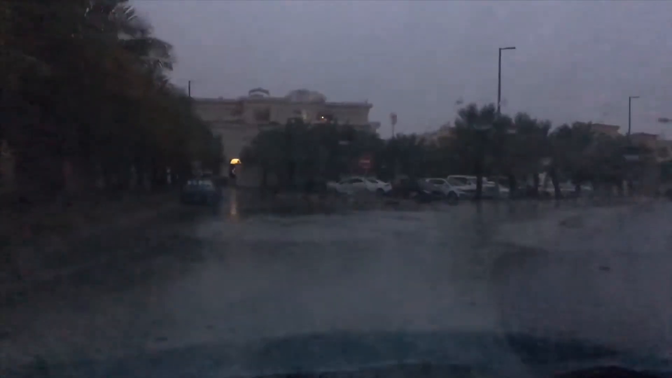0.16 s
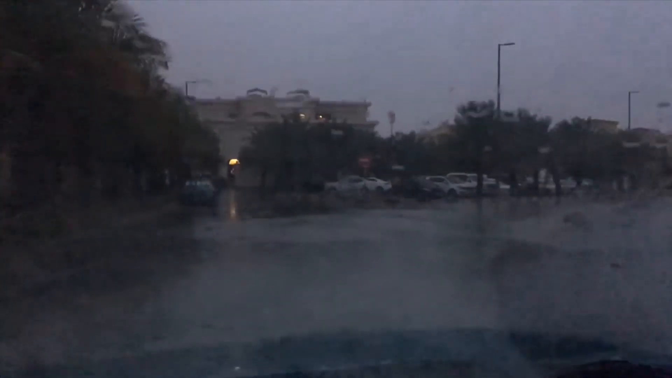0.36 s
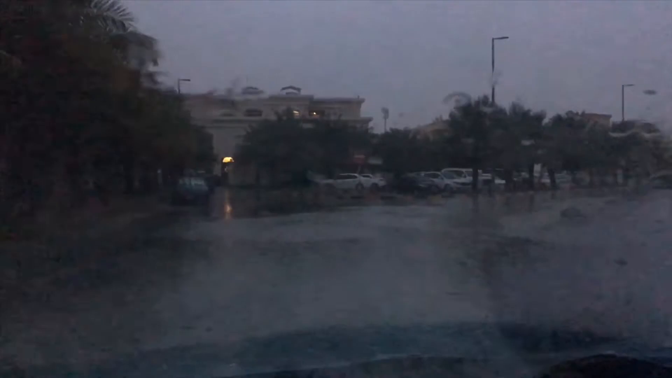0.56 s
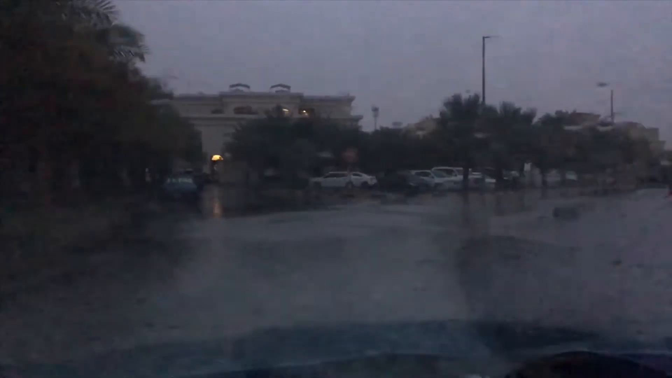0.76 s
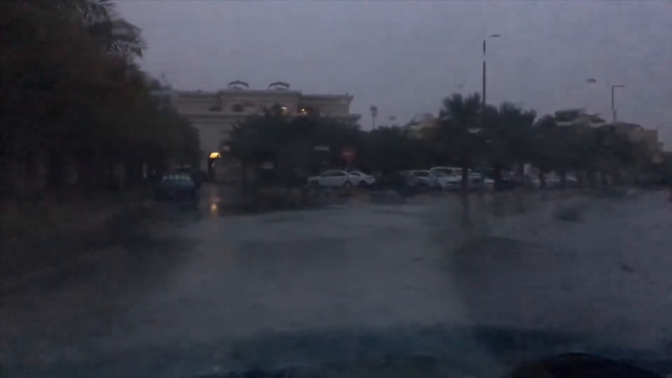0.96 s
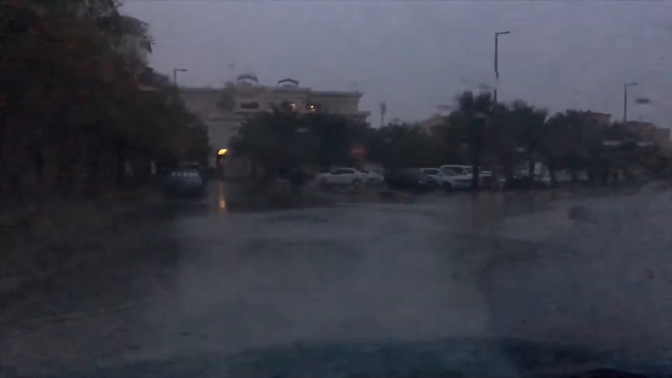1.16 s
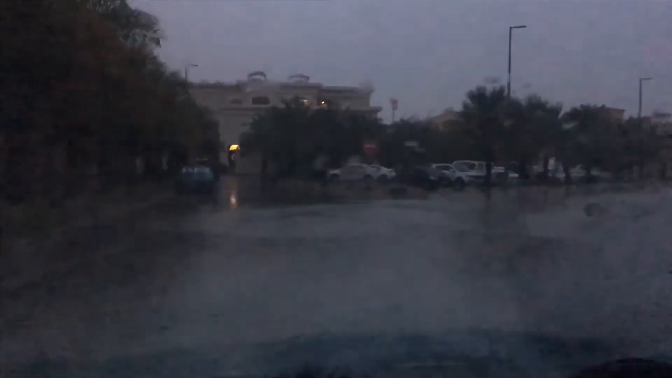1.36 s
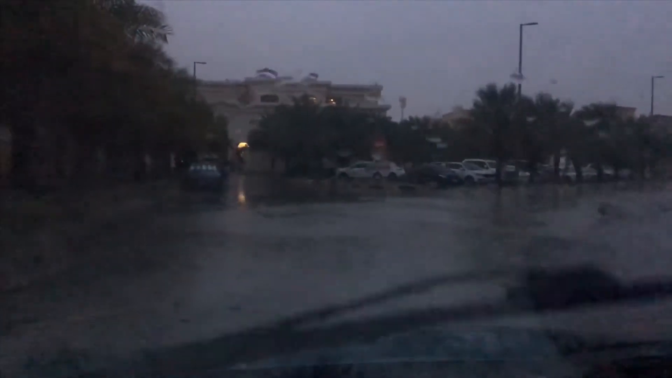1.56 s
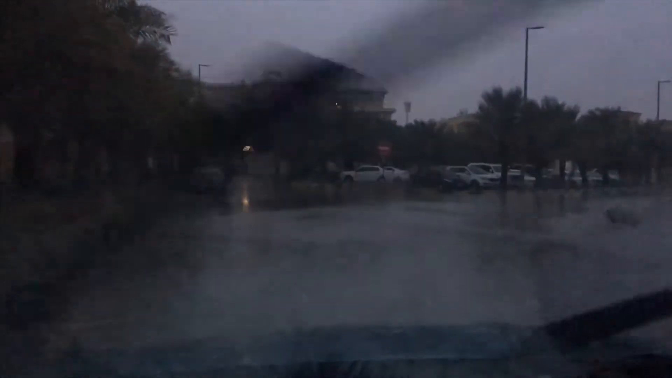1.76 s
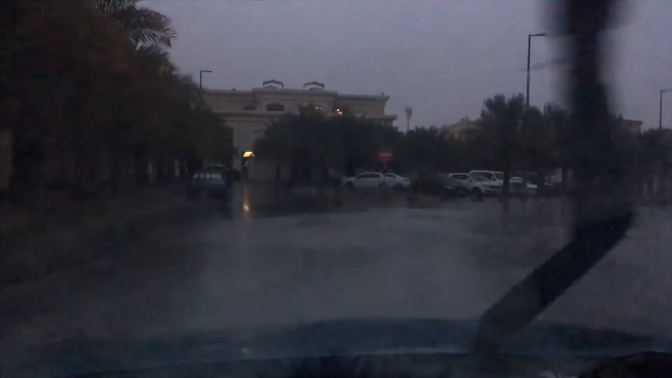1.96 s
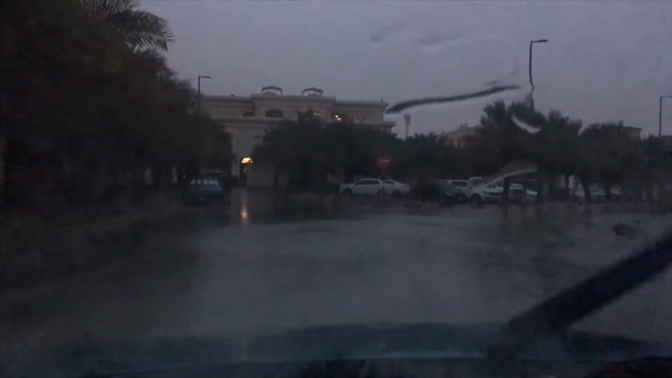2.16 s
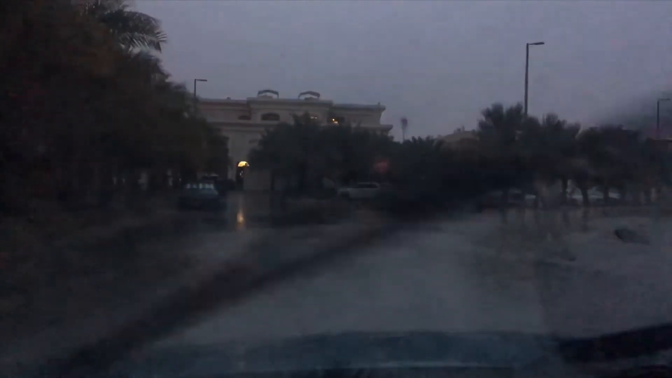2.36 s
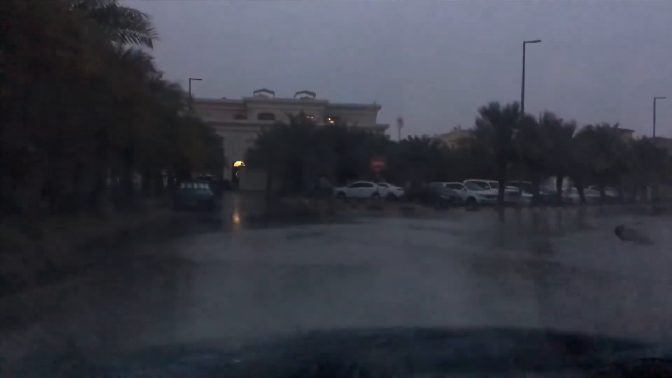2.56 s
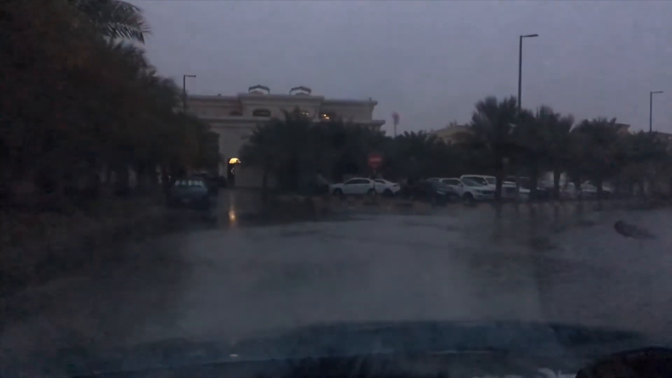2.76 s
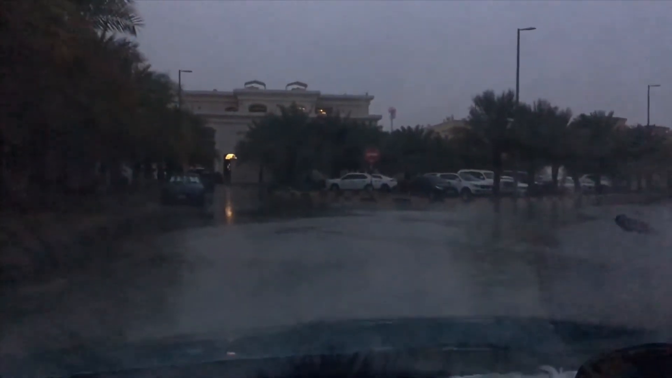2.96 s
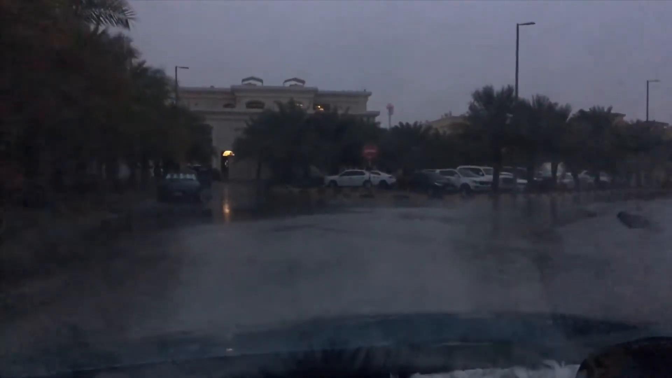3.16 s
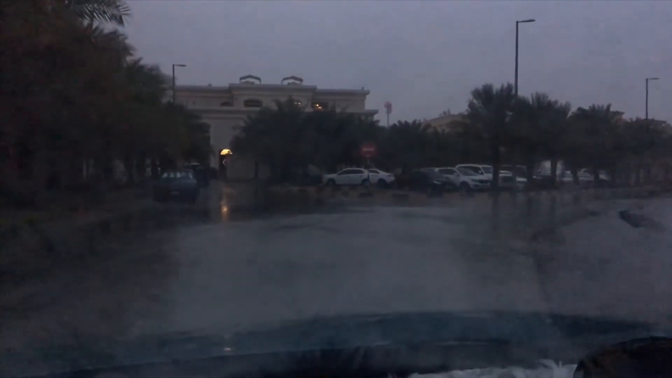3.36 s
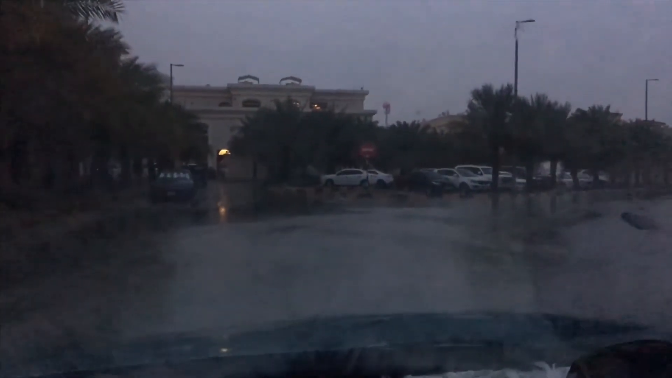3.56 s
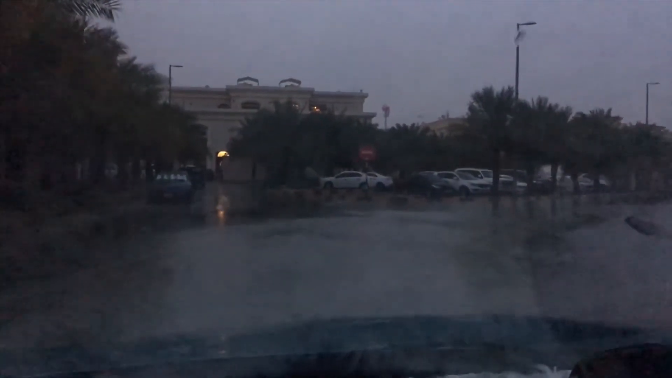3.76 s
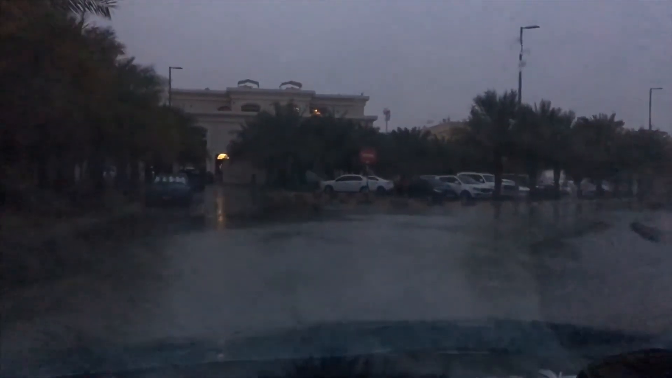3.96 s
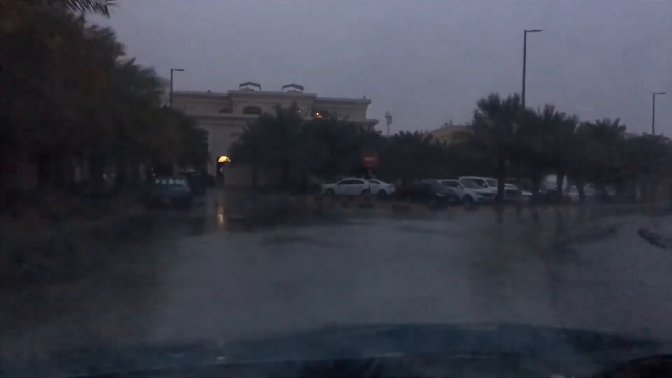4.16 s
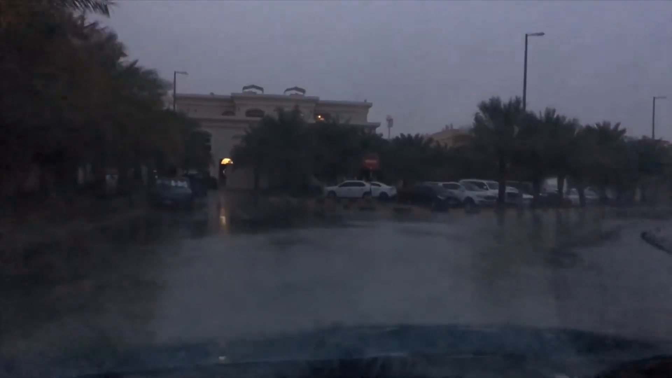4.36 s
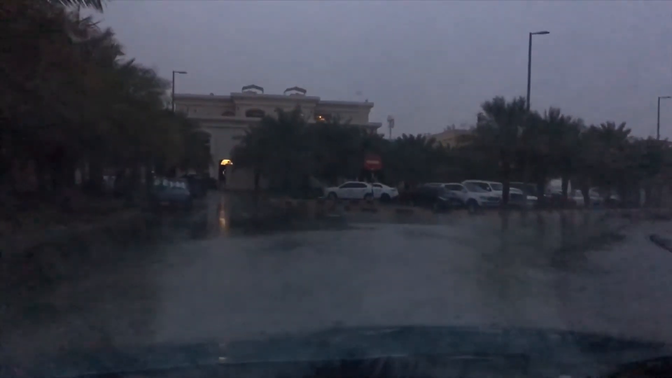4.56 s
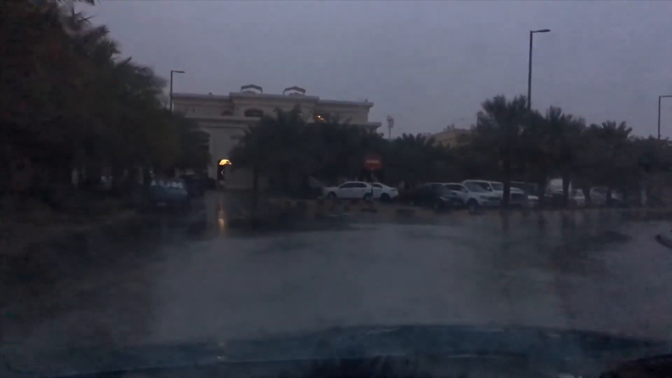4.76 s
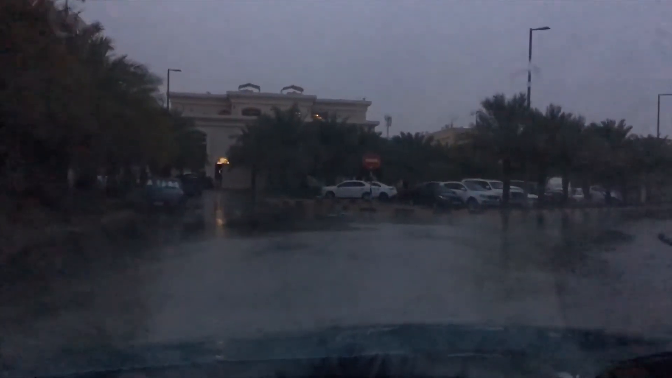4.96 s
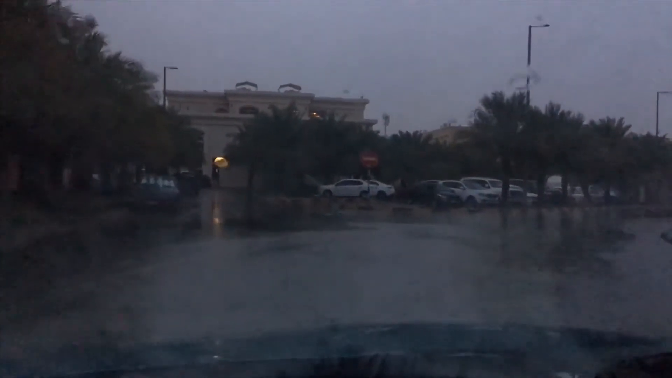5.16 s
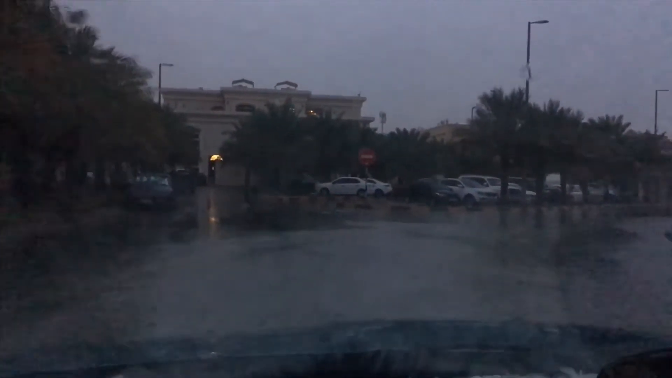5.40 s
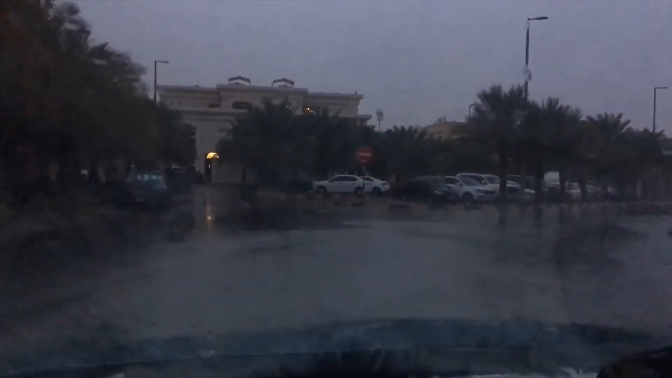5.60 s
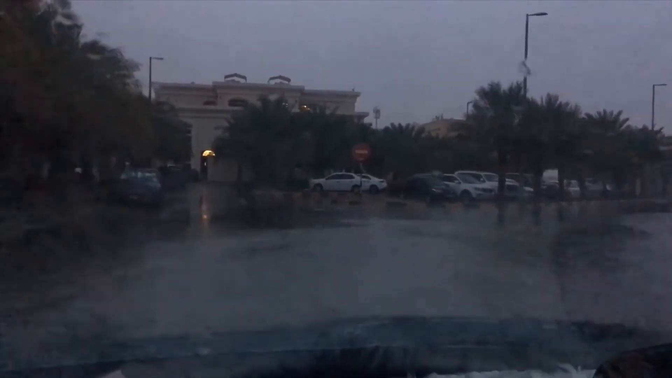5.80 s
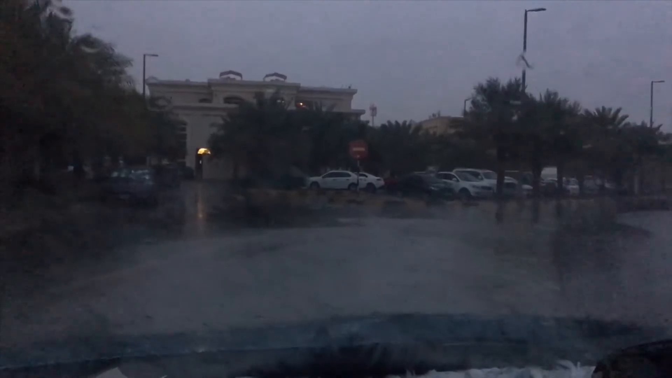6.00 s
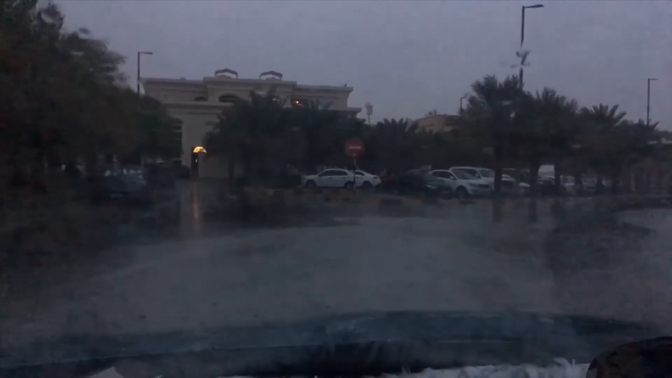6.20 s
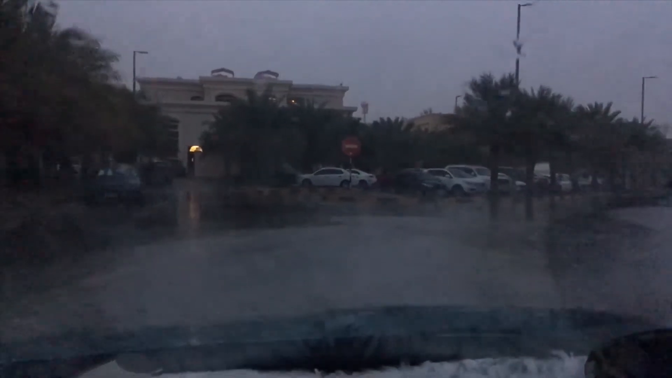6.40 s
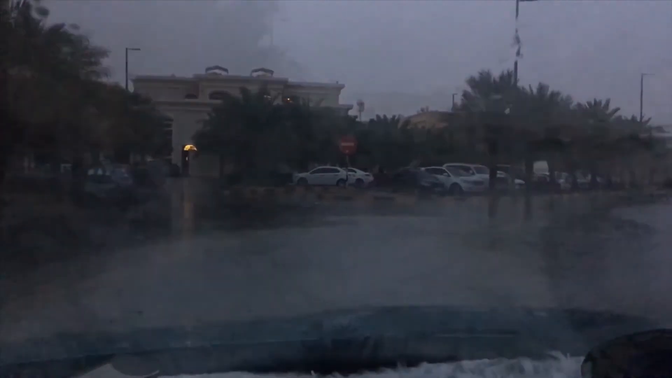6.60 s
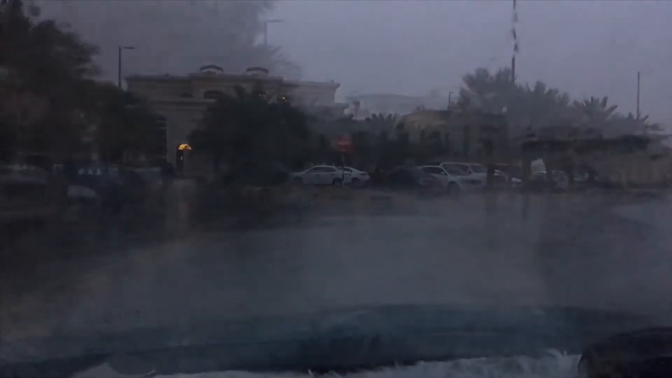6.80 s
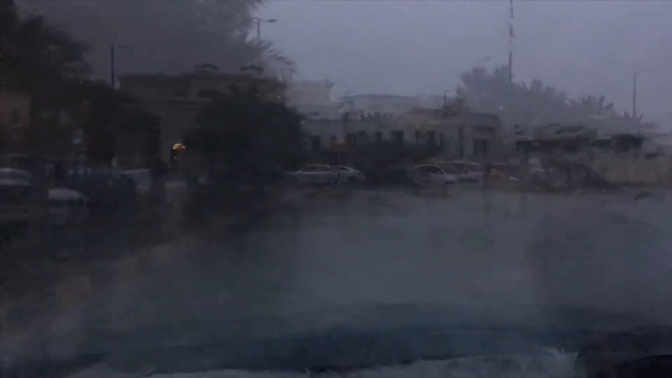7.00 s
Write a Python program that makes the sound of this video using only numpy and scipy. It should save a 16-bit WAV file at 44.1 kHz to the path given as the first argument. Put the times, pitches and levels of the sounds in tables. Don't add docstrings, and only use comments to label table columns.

```python
import sys
import numpy as np
from scipy import signal
from scipy.io import wavfile
from scipy.ndimage import uniform_filter1d

SR = 44100
rng = np.random.default_rng(int(sys.argv[2]) if len(sys.argv) > 2 else 0)


def pcm_store(signal):
    levels = np.round(np.clip(np.atleast_2d(signal), -1, 1) * 32767)
    wavfile.write(sys.argv[1], SR, levels.astype(np.int16).T)


def ratio_of_db(decibels):
    return 10 ** (np.asarray(decibels, float) / 20)


N = 310464
T = np.arange(N) / SR


def level(x, db):
    return x * ratio_of_db(db) / np.sqrt(np.mean(x ** 2) + 1e-18)


def to_peak(x, db):
    return x * ratio_of_db(db) / np.abs(x).max()


def decay(t, t60):
    return ratio_of_db(-60 * t / t60)


def ring(x, hz, width):
    return signal.lfilter(*signal.iirpeak(min(hz, .45 * SR), hz / width, SR), x)


def body(x, modes):
    return sum((-1) ** k * ratio_of_db(db) * ring(x, hz, width) for k, (hz, width, db) in enumerate(modes))


def fade(x, t60):
    return signal.lfilter([1], [1, -np.exp(-np.log(1000) / (t60 * SR))], x)


def walk(rate):
    k = int(SR / rate)
    steps = np.repeat(rng.standard_normal(N // k + 1), k)
    return 1.57 * uniform_filter1d(uniform_filter1d(steps, k), k)[:N]


def curve(table):
    s, *columns = np.transpose(table)
    return [np.interp(T, s, c) for c in columns]


def boom():
    # time in seconds, level in dB.
    air_levels = [(0, -29), (.7, -28), (1.15, -34.5), (1.5, -30), (2, -34), (2.85, -30), (3.1, -35.5),
                  (3.9, -30), (4.3, -24.5), (4.7, -32), (5.3, -28), (5.7, -27), (6.1, -26), (6.5, -25.5),
                  (7.04, -30)]
    # time in seconds, level in dB.
    panel_levels = [(0, -35), (.5, -35.5), (1.2, -37), (2.1, -31.5), (2.7, -36.5), (3.3, -36.5), (3.9, -37),
                    (4.3, -35), (5.3, -34), (6, -33), (6.5, -36), (7.04, -36)]
    # pitch in Hz, width in Hz, level in dB.
    air_modes = [(33.8, 9.5, -9.5), (52.1, 16.2, -5), (69.4, 16.4, -10.5)]
    # pitch in Hz, width in Hz, level in dB.
    panel_modes = [(85.5, 38.8, 5), (125.5, 36.7, 0), (153.6, 25, 1), (280, 64, -15.5), (368.4, 77, -18)]
    air = body(body(rng.standard_normal(N), air_modes), [(53.3, 28.0, 0)])
    air = air / uniform_filter1d(air ** 2, size=5000) ** 0.4
    air = air[::-1]
    panels = 0
    for hz, width, db in panel_modes:
        hum = ring(ring(rng.standard_normal(N), hz, width), hz, 1.6 * width)
        panels = panels + ratio_of_db(db + 2.0 * walk(9.8)) * hum
    air = level(air, -0.097) * ratio_of_db(curve(air_levels)[0] + 1.53 * walk(8.0))
    return air + level(panels, 0.13) * ratio_of_db(curve(panel_levels)[0])


def engine():
    # time in seconds, firing rate in Hz, level in dB.
    speed = [
        (0, 27.41, -66),
        (3, 28.94, -35.5),
        (3.8, 31.7, -34.5),
        (4.4, 32.68, -31),
        (5.4, 33.56, -31.5),
        (6.3, 35.56, -30.5),
        (7.04, 36.77, -36),
    ]
    # multiple of the firing rate, level in dB.
    orders = [(1, 2.5), (3, -19.5), (4, -16.5), (5, -18.5), (6, -19), (7, -39)]
    hz, db = curve(speed)
    turn = 2 * np.pi * np.cumsum(hz * (1 + 0.0049 * walk(6.5))) / SR
    hum = sum(ratio_of_db(order_db + 1.17 * walk(4.3)) * np.sin(k * turn + k * k) for k, order_db in orders)
    return ratio_of_db(db) * hum


def rain(per_second=260, scatter_db=3.5, colour_db=3.0, bed=0.28, crisp=1.5):
    # time in seconds, patter level in dB, brightness in dB per octave above 3500 Hz.
    shower = [(0, -56, -0.5), (.4, -54.5, 2), (.75, -57, 4), (1.1, -55, 0.5), (1.6, -51.5, -1),
              (1.78, -59.5, 1.5), (2.0, -57.5, 4.5), (2.6, -56, 2), (2.85, -59, 0.5), (3.2, -55, -0.5),
              (3.55, -58, 0.5), (4.3, -57.5, 0), (5.4, -56.5, -1.5), (6.3, -58, 0.5), (7.04, -58.5, 0)]
    # frequency in Hz, level in dB per Hz.
    patter = [(240, -32), (400, 1), (742, -7), (994, -8.5), (1380, -13), (1990, -13), (2800, -18.5),
              (3580, -14.5), (5030, -32), (5960, -24), (10100, -37.5), (11000, -35), (16000, -40)]
    biggest_db, treble_bed = 5, .5
    patter_db, bright = curve(shower)
    chance = rng.random((2400, 3))
    keep = chance[:, 2] < per_second * T[-1] / len(chance)
    where = (chance[:, 0] * N).astype(int)
    size = keep * ratio_of_db(np.minimum(-scatter_db * np.log(1 - chance[:, 1]), biggest_db))
    tint, out = rng.standard_normal(len(chance)), 0
    shape_hz, shape_db = np.transpose(patter)
    for hz in 450 * 2 ** np.arange(0, 5.3, 1 / 3):
        tint = 0.91 * tint + 0.77 * rng.standard_normal(len(chance))
        kicks = np.bincount(where, (size * ratio_of_db(colour_db * tint)) ** 2, N)
        power = fade(kicks, 0.0072 * (hz / 3000) ** -.45)
        blur = np.clip(bed * (hz / 3000) ** -.4, treble_bed, 1)
        click = crisp * np.sqrt((1 - blur) * kicks / power.mean())
        power = blur * ratio_of_db(2.0 * walk(22)) + (1 - blur) * power / power.mean()
        hiss = rng.standard_normal(N) * np.sqrt(power) + click
        hiss = ring(ring(hiss, hz, hz / 3), hz, hz / 3)
        db = np.interp(np.log(hz), np.log(shape_hz), shape_db) + 10 * np.log10(hz)
        out = out + level(hiss, db) * ratio_of_db(bright * max(np.log2(hz / 3500), 0))
    return level(out, 0.43) * ratio_of_db(patter_db)


def spits():
    # start in
    # seconds, peak of the click in dB, ring near 3.5 kHz in dB relative to it.
    clicks = [(0.0473, -48, -11), (0.0897, -59, 7), (0.0897, -46, -3), (0.171, -39, -2), (0.187, -23, -23),
              (0.281, -36, -17), (0.3272, -41, -8), (0.3561, -42, -5), (0.385, -38, -4), (0.414, -39, 0),
              (0.4573, -33, -4), (0.4853, -41, -20), (0.5062, -31, -22), (0.5726, -40, -15),
              (0.6799, -48, -4), (0.6802, -26, -20), (0.6953, -19, -27), (0.7422, -38, -16),
              (0.9363, -49, -8), (0.9632, -41, 0), (0.9727, -40, -10), (1.034, -55, 3), (1.1034, -46, -8),
              (1.131, -44, -7), (1.1816, -36, -21), (1.2221, -26, -13), (1.2565, -39, -7), (1.3414, -40, -3),
              (1.4476, -51, 1), (1.4596, -44, 0), (1.6048, -51, -3), (1.6886, -46, -4), (1.8731, -47, -5),
              (1.9405, -55, -6), (1.9406, -38, -18), (1.9629, -41, -22), (1.986, -49, 9), (2.0118, -24, -4),
              (2.0905, -40, -12), (2.133, -46, -8), (2.1465, -41, -7), (2.2034, -47, -12),
              (2.2177, -38, -15), (2.2434, -34, -14), (2.3092, -42, -15), (2.362, -49, -6), (2.391, -48, -3),
              (2.4109, -53, -2), (2.4513, -45, -19), (2.5755, -37, -22), (2.6788, -45, -12),
              (2.7375, -45, 7), (2.7891, -49, -10), (2.9442, -47, 3), (3.024, -48, -8), (3.0959, -44, -6),
              (3.185, -42, -7), (3.2091, -46, -4), (3.2839, -50, 4), (3.3124, -47, 2),
              (3.3923, -57, -3), (3.4228, -55, -4), (3.4467, -49, -12), (3.4951, -49, 5), (3.524, -47, -13),
            (3.563, -48, -9), (3.5869, -55, -1), (3.6138, -58, -5), (3.7835, -54, -8), (3.8573, -56, -10),
            (3.8573, -50, -16), (3.9226, -60, 1), (3.967, -58, -1), (3.979, -41, -14), (4.0399, -53, 5),
            (4.1102, -46, -4), (4.1431, -51, -4), (4.316, -46, -12), (4.3326, -54, -3), (4.5323, -45, -14),
            (4.5607, -49, -15), (4.659, -43, 2), (4.6934, -45, -7), (4.8306, -55, 1), (4.859, -45, -12),
            (4.8865, -53, -10), (4.926, -44, -12), (5.0092, -57, -3), (5.095, -49, -1), (5.1294, -54, 6),
            (5.1683, -52, 0), (5.2636, -52, -14), (5.2776, -51, -12), (5.313, -55, -5), (5.3544, -56, -2),
            (5.4831, -44, -13), (5.5175, -45, -8), (5.5879, -59, 7), (5.5879, -52, -5), (5.8044, -63, 5),
            (5.8044, -52, -6), (5.8857, -50, -6), (5.9366, -52, -1), (6.0164, -55, 0), (6.0438, -57, 5),
            (6.0613, -51, -13), (6.0957, -54, -3), (6.1566, -69, 8), (6.1566, -50, 1), (6.201, -43, -13),
            (6.3197, -49, -12), (6.3631, -47, -7), (6.392, -48, -10), (6.4758, -53, -12), (6.5162, -54, -6),
            (6.5387, -53, 2), (6.6799, -54, -4), (6.7712, -55, -1), (6.8515, -54, -4), (6.9094, -55, 0)]
    spit_t60_s, pane_t60_s, pane_hz, loudest_db = 0.006, .02, 3500, -33
    out, t = np.zeros(N + 1000), np.arange(1000) / SR
    top = signal.butter(2, [3800, 12500], "band", fs=SR)
    for s, db, pane_db in clicks:
        noise = rng.standard_normal((2, len(t)))
        noise[:, 0] = 2.9
        spit = signal.lfilter(*top, noise[0] * decay(t, spit_t60_s))
        pane = ring(noise[1] * decay(t, pane_t60_s), pane_hz * ratio_of_db(1.2 * noise[1, -1]), 1800)
        hit = to_peak(spit, 0) + to_peak(pane, pane_db - 0.5)
        out[int(s * SR):][:len(t)] += hit * ratio_of_db(min(db, loudest_db) - 4.5)
    return out[:N]


def bursts(hits):
    out, t = np.zeros(N + 3000), np.arange(3000) / SR
    for s, db, hz, spread in hits:
        slap = rng.standard_normal(len(t)) * (decay(t, 0.0032) + 0.39 * decay(t, 0.072))
        slap[0] = 3.9
        wide = ring(slap, hz, hz * spread * 0.86)
        burst = ring(wide, hz, hz * spread * 0.39) + 0.2 * wide
        out[int(s * SR):][:len(t)] += to_peak(burst, db - 4.5)
    return out[:N]


def roof_taps():
    # start in seconds, peak in dB.
    taps = [(.021, -39), (.391, -30), (.4574, -30.5), (0.885, -36), (1.105, -35.5), (1.3227, -36),
            (1.539, -40), (1.606, -33), (1.8734, -49), (2.1332, -36), (2.364, -31), (2.79, -43),
            (2.944, -35), (3.021, -37.5), (3.243, -32), (3.4236, -43), (3.5883, -39), (3.9238, -41),
            (3.9793, -38.5), (4.3819, -40), (4.5327, -44), (4.812, -41), (5.0107, -40.5), (5.4026, -41),
            (5.4829, -39), (5.8047, -43), (5.887, -36.5), (5.9376, -35), (6.044, -37), (6.1796, -37)]
    return bursts([(s, db, 2900, 1.66) for s, db in taps])


def windscreen_drops():
    # start in seconds, peak in dB, colour in Hz.
    near = [(.0916, -31.5, 3600), (.243, -33, 3280), (.258, -40.5, 3520), (.357, -36.5, 3420),
            (.4137, -33, 3500), (.6808, -28.5, 3780), (.936, -36.5, 3500), (1.0667, -37.5, 3240),
            (1.4608, -34.5, 3450), (1.492, -29.5, 3370), (1.689, -39, 3230), (2.0907, -34.5, 4420),
            (2.1867, -38.5, 3740), (2.244, -36, 3920), (2.391, -38, 3890), (2.4119, -33.5, 3370),
            (2.5357, -35.5, 3300), (3.0964, -37.5, 3980), (3.1098, -34.5, 3180), (3.2094, -35, 3300),
            (3.3118, -32.5, 3320), (4.041, -36.5, 3700), (4.1126, -42, 3400), (4.9787, -42, 3400),
            (5.096, -36.5, 3220), (5.1683, -35.5, 3470), (5.5877, -38, 4020), (6.2013, -39, 3500),
            (6.3635, -42, 3520), (6.772, -43, 3310)]
    return bursts([(*row, 0.93) for row in near])


def plops():
    # start in seconds, peak in dB, colour in Hz.
    heavy = [(.68, -41, 714), (1.158, -40, 2500), (1.327, -43, 743), (1.343, -24, 900), (1.41, -30, 816),
             (1.434, -36, 1100), (1.45, -29, 1340), (1.494, -46, 859), (1.539, -29, 1110),
             (1.606, -31, 1170), (1.622, -30, 950), (1.691, -33, 735), (1.894, -30, 800),
             (1.923, -29.5, 850), (1.883, -26, 830), (1.908, -19, 574), (2.248, -43, 802),
             (4.041, -41, 1500), (4.05, -37, 950), (4.394, -45, 1010)]
    return bursts([(*row, 0.73) for row in heavy])


def metal_snaps():
    # start in seconds, peak in dB, colour in Hz.
    snaps = [(.048, -43, 10000), (.08, -41, 12500), (.1875, -22, 10840), (.2155, -38, 6500),
             (.282, -31, 11800), (.385, -33, 14900), (.5073, -38, 9230), (.6955, -31, 9000),
             (.696, -23, 14000), (.7424, -35, 9100), (1.9629, -33, 9400), (2.147, -36, 6400),
             (2.452, -56, 9000), (2.576, -40, 12400), (2.02, -31, 13000), (2.718, -44, 6500),
             (3.033, -42, 13500), (3.112, -46, 10800), (3.209, -39, 12800), (3.285, -47, 9500),
             (3.8576, -46, 7810)]
    return bursts([(*row, 0.56) for row in snaps])


def struck(events, modes, crack_db, vary_db, echo_db):
    out, t = np.zeros(N + 5000), np.arange(5000) / SR
    hz, mode_db, t60 = np.transpose(modes)[:, :, None]
    for s, db, tilt in events:
        chance = rng.standard_normal((3, len(modes), 1))
        gain = ratio_of_db(mode_db + vary_db * chance[0] + tilt * np.log2(hz / 5000) - 60 * t / t60)
        chatter = np.cumsum(rng.standard_normal((len(modes), len(t))), axis=1) * 0.22 * np.sqrt(hz / SR)
        hit = (gain * np.sin(2 * np.pi * hz * (1 + 0.0042 * chance[1]) * t + chatter)).sum(0)
        crack = rng.standard_normal(len(t)) * ratio_of_db(crack_db) * decay(t, 0.014)
        hit = to_peak(hit, 0) + ring(crack, np.median(hz), 9000)
        echo = rng.standard_normal(2500) * ratio_of_db(echo_db) * decay(t[:2500], 0.064)
        hit = hit + signal.fftconvolve(hit, echo)[:len(t)]
        out[int(s * SR):][:len(t)] += to_peak(hit, db - 4.0)
    return out[:N]


def keys():
    # start in seconds, peak in dB, dull to bright tilt in dB per octave.
    clinks = [(0.1878, -20.5, -3.5), (0.2803, -34.5, -15), (0.6955, -15, 2.5), (0.742, -41, -16),
              (0.7926, -53.5, -3), (1.94, -37, 4), (2.2458, -31, -7), (2.3097, -36, 5), (3.858, -41, 11),
              (4.9277, -40, -4.5), (5.278, -41.5, 19)]
    # pitch in Hz, level in dB, time to die by 60 dB in seconds.
    key_modes = [(1704, -22.5, 0.12), (4350, -2, 0.039), (8450, -29, 0.022), (9060, 11, 0.019),
                 (10200, -16, 0.019), (10300, -3, 0.04), (11200, 0, 0.045), (11750, 1, .025),
                 (14000, 2, .03), (14700, -5, 0.026), (15300, -6, 0.015)]
    # start in seconds, peak in dB, tilt in dB per octave.
    ring_hits = [
        (0.5004, -45, 0),
        (0.5062, -28, 0),
        (0.5194, -28.5, 0.0042),
        (0.5274, -36, 0),
        (0.5504, -44, 0),
        (0.572, -38.5, 0),
        (0.636, -46, 0),
        (1.9629, -37, 0),
        (2.6783, -38, 0),
    ]
    # pitch in Hz, level in dB, time to die by 60 dB in seconds.
    ring_modes = [(1984, -0.5, 0.053), (4670, -12, 0.029), (5980, -1, 0.028), (6740, -3, 0.033),
                  (8000, -17, .025), (9460, -3, 0.052), (9380, -2, 0.027), (10760, 4, 0.025),
                  (12300, -1, 0.028), (14140, -10, 0.029), (15600, -7, .02)]
    clinking = struck(clinks, key_modes, crack_db=-18, vary_db=5.9, echo_db=-39.0)
    return clinking + struck(ring_hits, ring_modes, crack_db=-8.0, vary_db=3.4, echo_db=-21.5)


def relay():
    # start in seconds, peak in dB, dull to bright tilt in dB per octave.
    ticks = [
        (1.2226, -22.5, 5),
        (1.2577, -29.5, -4),
        (2.0118, -19, -2.5),
        (2.7389, -42, -2.6),
    ]
    # pitch in Hz, level in dB, time to die by 60 dB in seconds.
    modes = [(1390, -9, 0.03), (1835, -5, 0.07), (1958, 5, 0.071), (2700, -3, 0.027), (3300, 0, 0.04),
             (4380, -6, 0.016), (5320, -10, 0.016), (5790, 3.5, 0.025), (6760, -2, 0.03),
             (7600, -26, 0.014), (8410, -3, 0.03), (10000, -7, 0.016), (12700, -22, .03), (15300, -25, .04)]
    # start in seconds, peak in dB.
    jolts = [
        (1.2227, -26),
        (1.2577, -31),
        (2.012, -18.5),
        (2.738, -24),
    ]
    # pitch in Hz, level in dB, spread in octaves.
    housing = [(1400, -7.5, 0.47), (1870, -3.5, 0.41), (2760, -2.5, 1.1), (3500, -6.5, 1.2)]
    jolt = bursts([(s, db + part_db, hz, spread) for s, db in jolts for hz, part_db, spread in housing])
    return struck(ticks, modes, crack_db=-5, vary_db=3.5, echo_db=-24.0) + jolt


def thumps():
    # start in seconds, peak in dB, colour in Hz.
    jumps = [
        (1.335, -17, 105),
        (1.343, -14.5, 233),
        (1.39, -18, 105),
        (1.452, -13.5, 298),
        (1.531, -11, 219),
        (1.645, -17.5, 119),
        (1.946, -21.5, 105),
        (2.38, -35, 260),
        (2.42, -31.5, 292),
        (2.63, -31, 264),
    ]
    out, t = np.zeros(N + 6000), np.arange(6000) / SR
    for s, db, hz in jumps:
        push = np.sin(np.pi * np.clip(2 * hz * t, 0, 1))
        rumble = level(ring(rng.standard_normal(len(t)), hz, hz), 0) * decay(t, 0.06)
        hit = ring(push + 0.26 * rumble, hz, hz * 0.63)
        out[int(s * SR):][:len(t)] += to_peak(hit, db)
    return out[:N]


def strokes():
    # start in seconds, peak in dB, colour in Hz.
    catches = [(1.3183, -36, 1160), (1.3414, -25, 1170), (1.4345, -39, 1350), (1.4495, -34, 1350),
               (1.4934, -37, 2030), (1.4999, -36, 1300), (1.5403, -34, 1310), (1.5613, -36, 1360),
               (1.5927, -39, 1150), (1.6062, -35, 1190), (1.6131, -33, 2470), (1.6231, -35, 1100),
               (1.6308, -31, 1160), (1.6555, -32, 1100), (1.69, -31, 1480), (1.6986, -32.5, 1680),
               (1.7374, -49, 1180), (1.7853, -53, 1190), (1.8192, -48, 1100), (1.8341, -43, 1260),
               (1.8431, -42, 1200), (1.8738, -34, 1250), (1.8965, -39, 1130), (1.9075, -40, 1100),
               (1.9596, -43, 1130)]
    out, t = np.zeros(N + 800), np.arange(800) / SR
    for s, db, hz in catches:
        noise = rng.standard_normal(len(t))
        noise[0] = 4.0
        hit = ring(ring(noise * decay(t, 0.013), hz, hz * .7), hz, hz * 1.6)
        out[int(s * SR):][:len(t)] += to_peak(hit, db - 2.0)
    return out[:N]


def squeal():
    # time in seconds, slip rate in Hz, level in dB.
    song = [
        (1.745, 366.3, -38),
        (1.76, 352, -23),
        (1.779, 340, -34.5),
        (1.801, 375, -39),
        (1.821, 435.4, -32.5),
        (1.842, 344.6, -26),
        (1.852, 311, -16),
        (1.872, 298.7, -19),
        (1.912, 276, -24.5),
    ]
    # multiple of the slip rate, level at full cry in dB, dB lost per dB of softer singing.
    orders = [(1, 0.5, 0), (2, -18, 1.0), (3, -31.5, 1.5)]
    hz, db = curve(song)
    edge = np.clip(np.minimum(T - song[0][0], song[-1][0] - T) / 0.0065, 0, 1)
    turn = 2 * np.pi * np.cumsum(hz * (1 + .02 * walk(150))) / SR
    softer = db - db[edge > 0].max()
    tone = 0
    for k, order_db, loss in orders:
        tone = tone + ratio_of_db(order_db + loss * softer + 1.2 * k * walk(90)) * np.sin(k * turn)
    return edge * ratio_of_db(db + 2.5) * tone


def wiper():
    # start in
    # seconds, # length in seconds, slip or hum rate in Hz, level in dB, grit in dB relative to the thud.
    judder = [(1.319, 0.035, 258, -21.5, -26), (1.343, 0.043, 219.7, -25, -22),
              (1.372, 0.083, 326.3, -24, -30), (1.419, 0.046, 280, -24, -39),
              (1.448, 0.045, 109.8, -22, -30), (1.485, 0.092, 265, -26.5, -20.5),
              (1.522, 0.076, 166.1, -22, -34), (1.592, 0.098, 153.6, -23, -32),
              (1.604, 0.062, 121.7, -25, -19.5), (1.686, 0.041, 121.4, -24, -24.5),
              (1.748, 0.036, 150.6, -31.5, -28), (1.838, 0.085, 291, -32, -15),
              (1.881, 0.085, 202.2, -24.5, -24), (1.917, 0.067, 103.7, -24, -28.5),
              (2.138, 0.15, 121.7, -39, -39), (2.341, 0.16, 140.7, -36, -27),
              (2.58, 0.15, 120.8, -37.5, -26)]
    # pitch in Hz, width in Hz, level in dB.
    screen = [(105, 20.4, 8), (173, 57.5, 6), (310.7, 57.5, 4.5), (411, 44.5, -1.5), (499, 98, -7)]
    # pitch in Hz, width in Hz, level in dB.
    blade = [(700, 550, 11.5), (1070, 350, -3.5), (1930, 730, 2), (3300, 2100, -9)]
    turn_s, sag = 1.71, .085
    out, t = np.zeros(N + 8000), np.arange(8000) / SR
    for s, length, hz, db, grit_db in judder:
        back = s > turn_s
        rough = .15 if back else .26
        tilt_db = -6 if back else 0
        chance = rng.standard_normal((60, 3))
        part = np.clip(t / length, 0, 1)
        phase = np.cumsum(hz * (1 - sag * part)) / SR
        gaps = np.exp(.5 * rough * chance[:, 0])
        slips = np.searchsorted(phase, np.cumsum(gaps) - .9).clip(0, len(t) - 1)
        press = np.sin(np.pi * part ** 0.41) ** 0.71
        knocks = np.bincount(slips, ratio_of_db(6.4 * rough * chance[:, 1]), len(t)) * press
        soft = signal.butter(2, np.clip(1100 * ratio_of_db(db + 20.5), 90, 1000), fs=SR)
        thud = body(signal.lfilter(*soft, knocks), screen)
        scrape = fade(np.bincount(slips, ratio_of_db(4.0 * chance[:, 2]), len(t)) * press, 0.011)
        grit = 0
        for f, width, part_db in blade:
            rasp = ring(ring(scrape * rng.standard_normal(len(t)), f, width), f, 2.9 * width)
            grit = grit + ratio_of_db(part_db + tilt_db * np.log2(f / 700)) * rasp
        span = np.sqrt(length * SR / len(t))
        out[int(s * SR):][:len(t)] += span * (level(thud, db) + level(grit, db + grit_db))
    return out[:N]


def scene():
    weather = rain() + spits() + roof_taps() + windscreen_drops() + plops()
    loose_parts = metal_snaps() + keys() + relay()
    wiping = thumps() + strokes() + squeal() + wiper()
    return (boom() + engine() + weather + loose_parts + wiping)[None]


def roll_off(x):
    return signal.sosfilt(signal.butter(12, 16510, fs=SR, output="sos"), x)


def record(dry):
    dry = signal.sosfilt(signal.butter(2, 26, "high", fs=SR, output="sos"), dry)
    dry = signal.sosfilt(signal.ellip(8, .5, 60, 15900, fs=SR, output="sos"), dry)
    dry = dry * np.clip((T[-1] - T) / .012, 0, 1)
    return roll_off(dry)


dry = scene()
out = record(dry)
pcm_store(out)
```